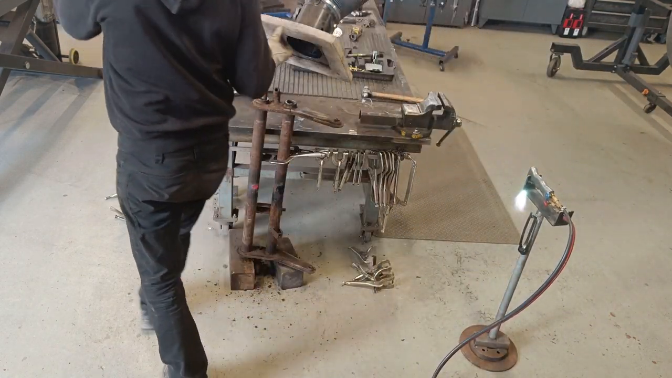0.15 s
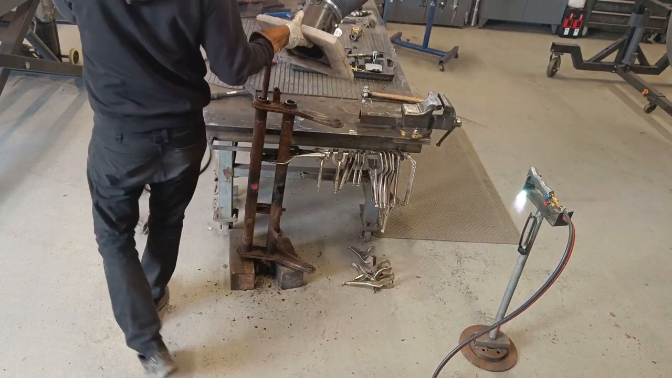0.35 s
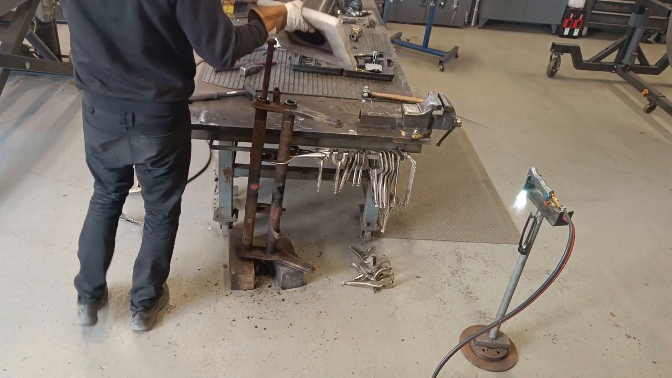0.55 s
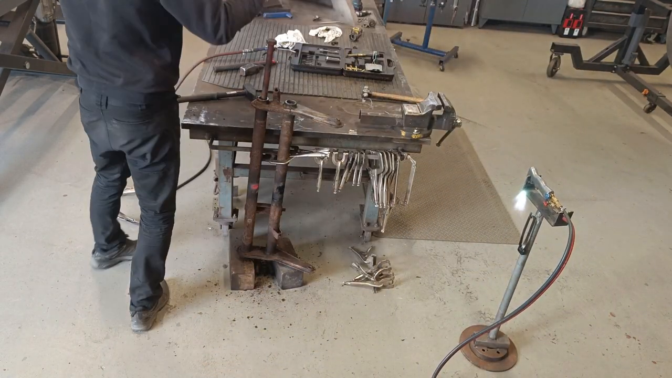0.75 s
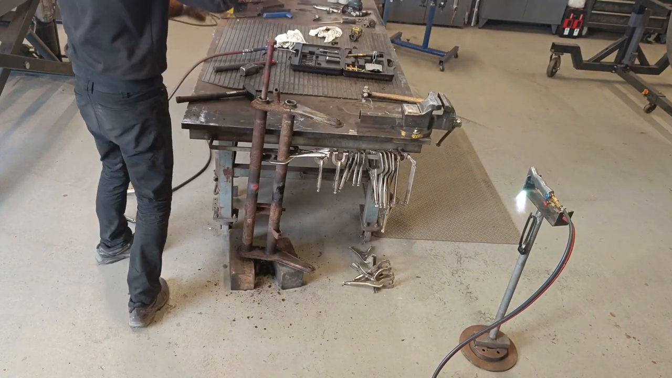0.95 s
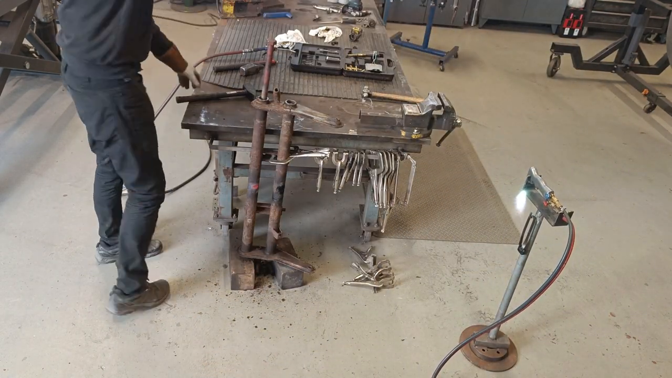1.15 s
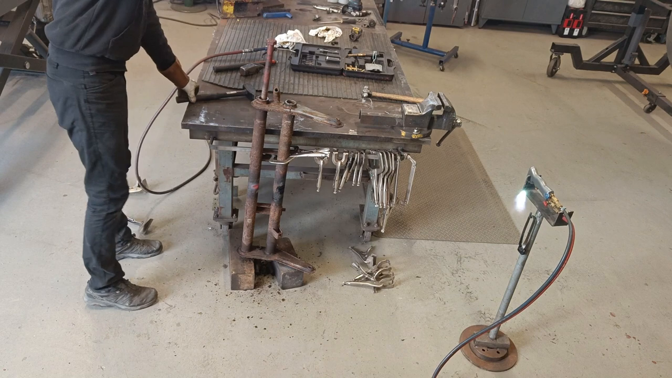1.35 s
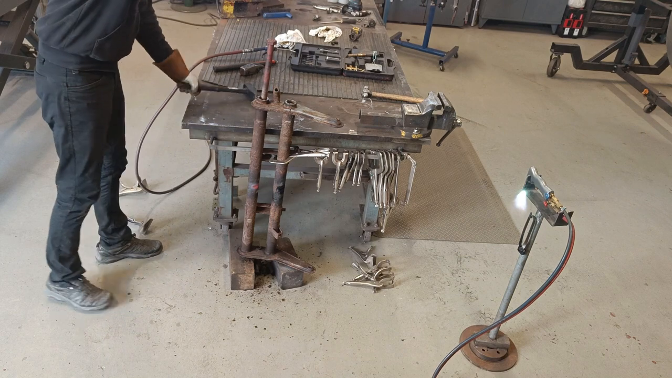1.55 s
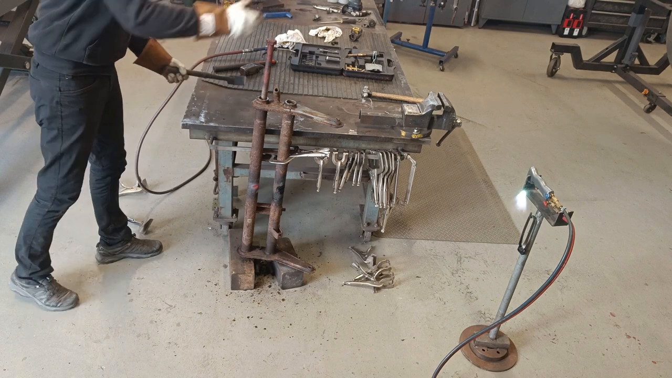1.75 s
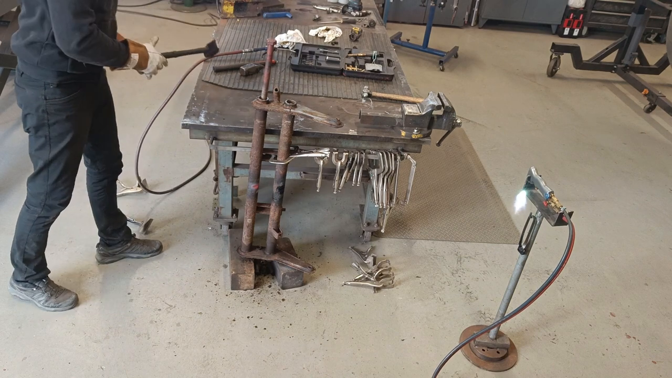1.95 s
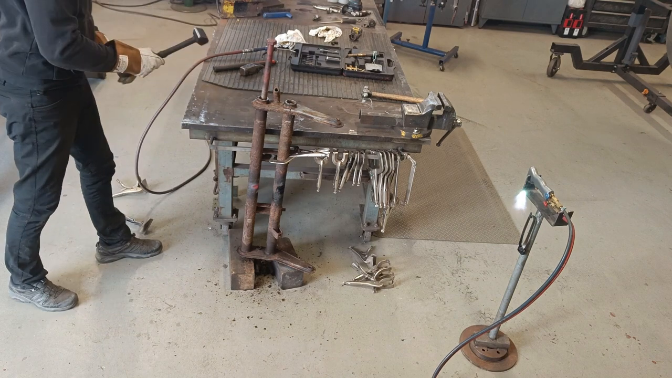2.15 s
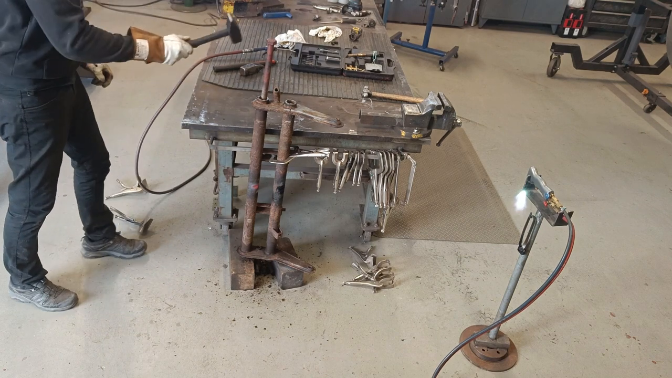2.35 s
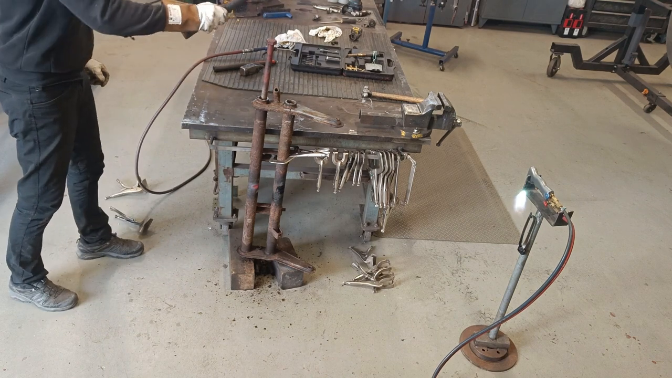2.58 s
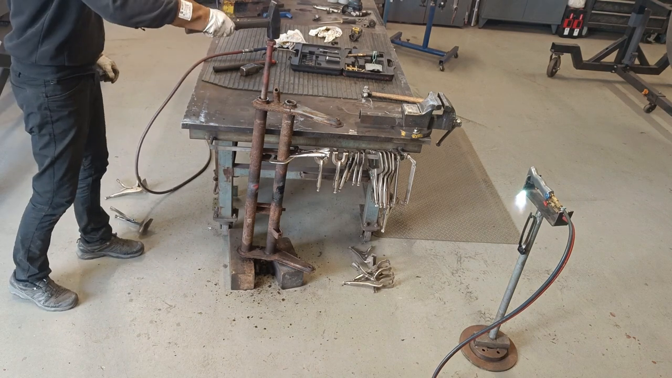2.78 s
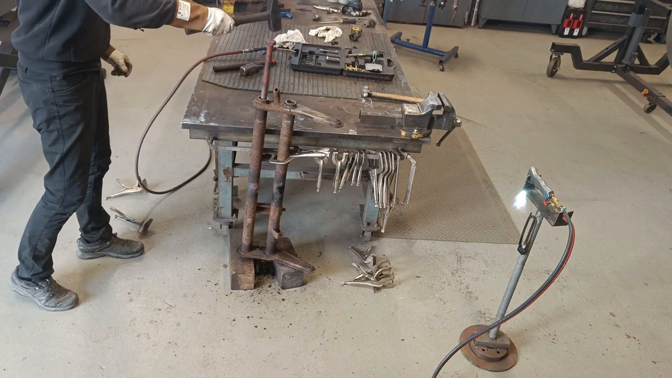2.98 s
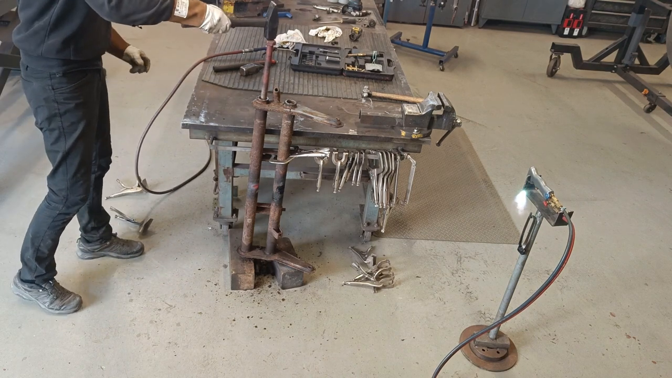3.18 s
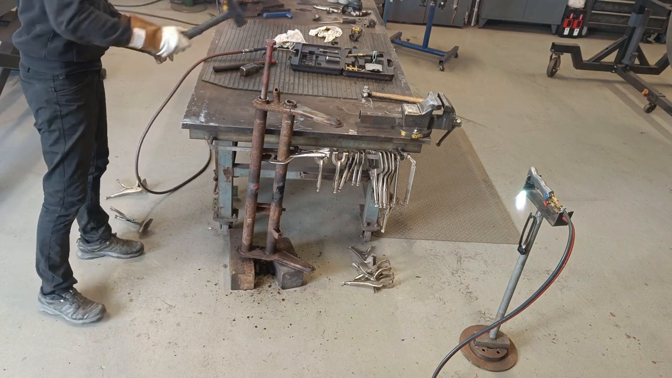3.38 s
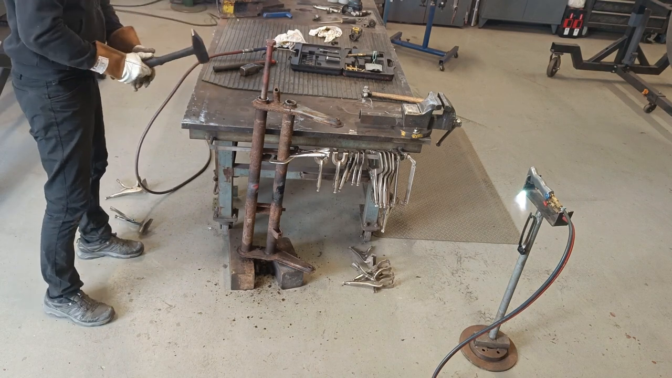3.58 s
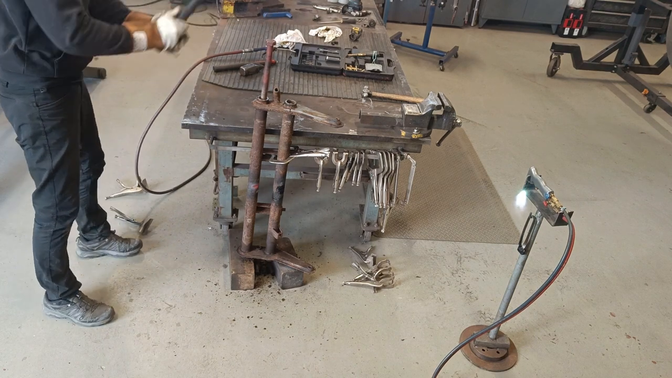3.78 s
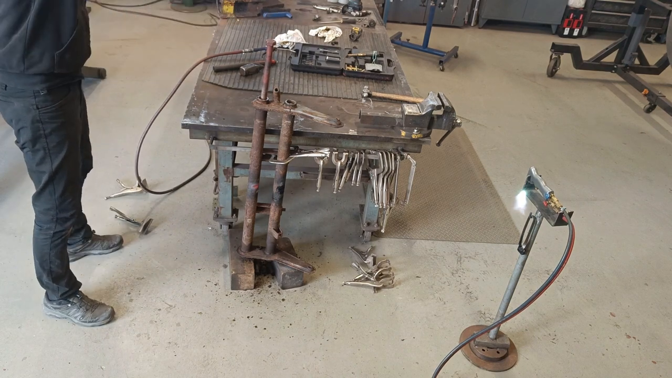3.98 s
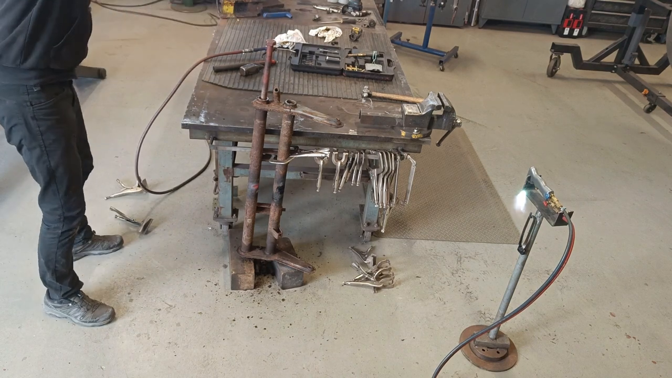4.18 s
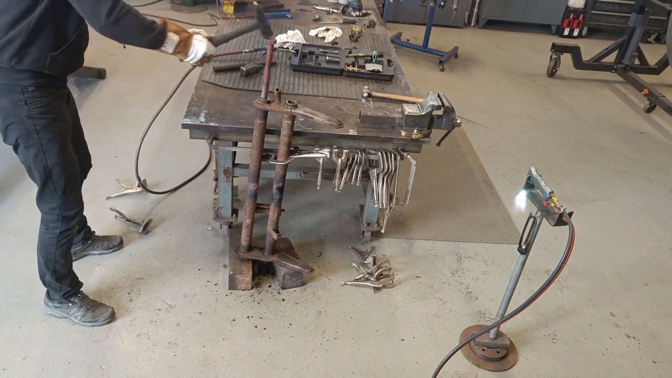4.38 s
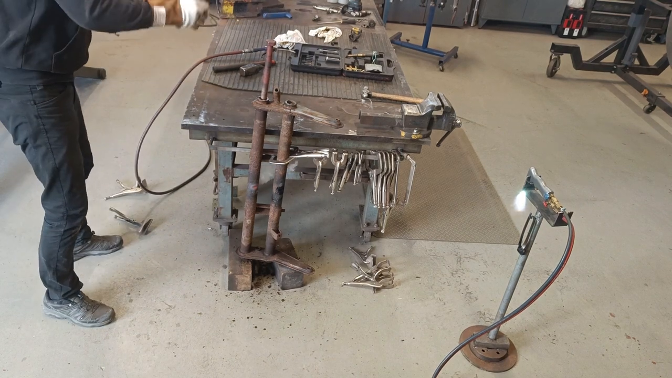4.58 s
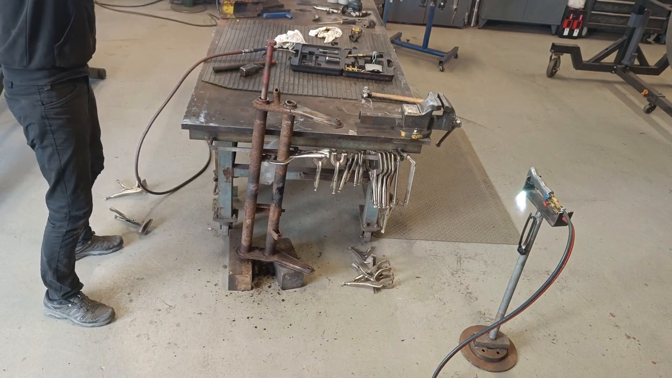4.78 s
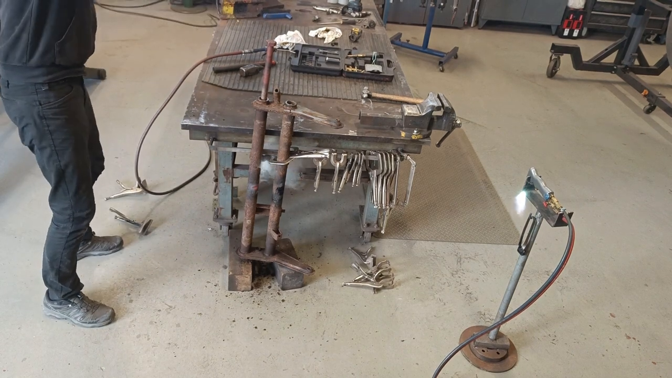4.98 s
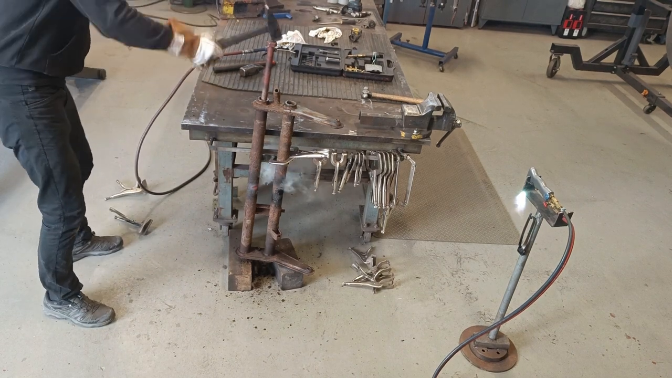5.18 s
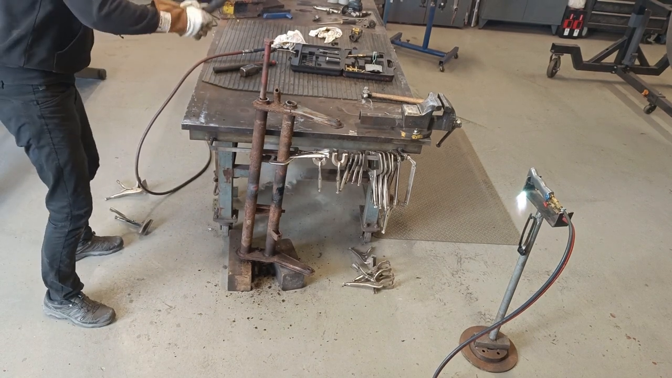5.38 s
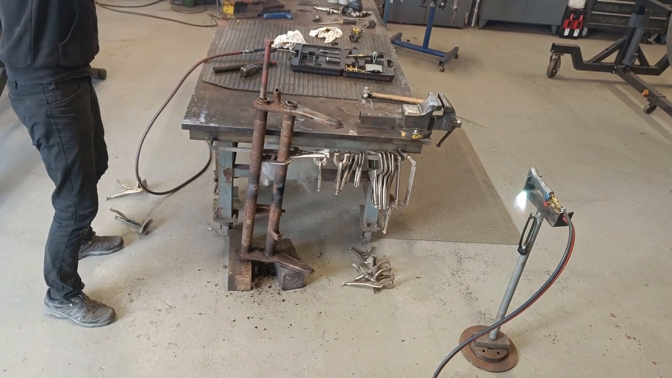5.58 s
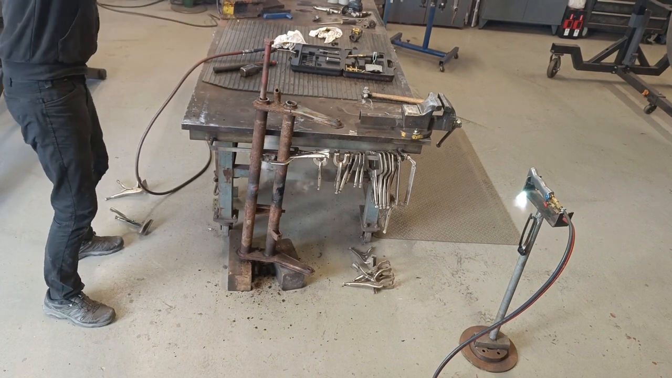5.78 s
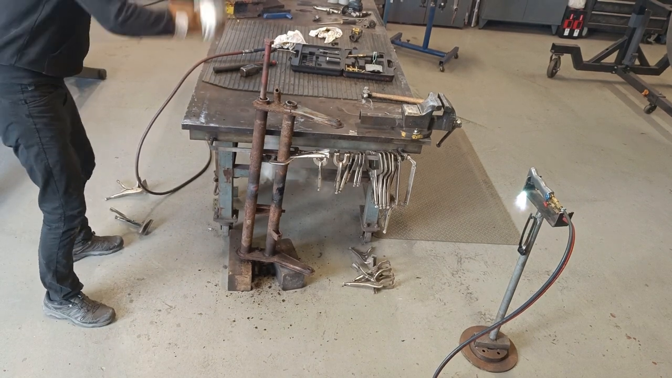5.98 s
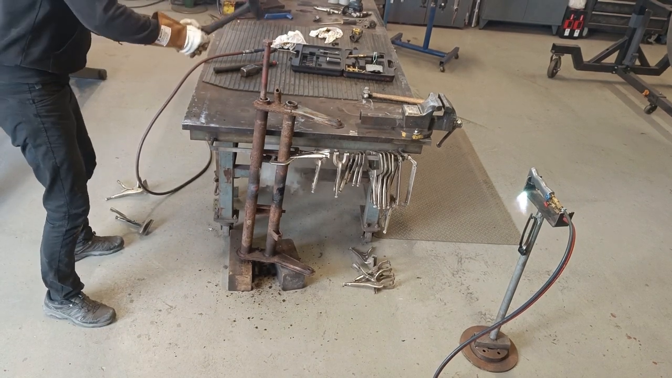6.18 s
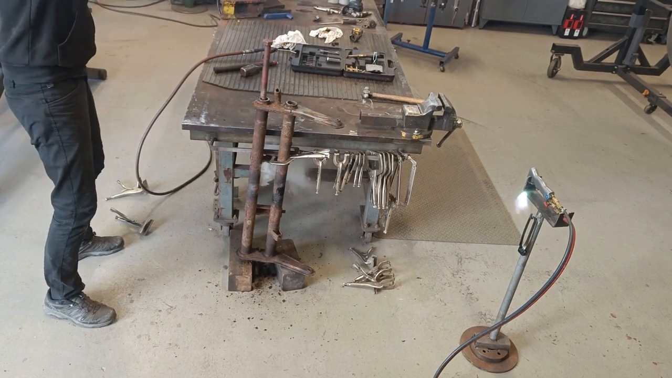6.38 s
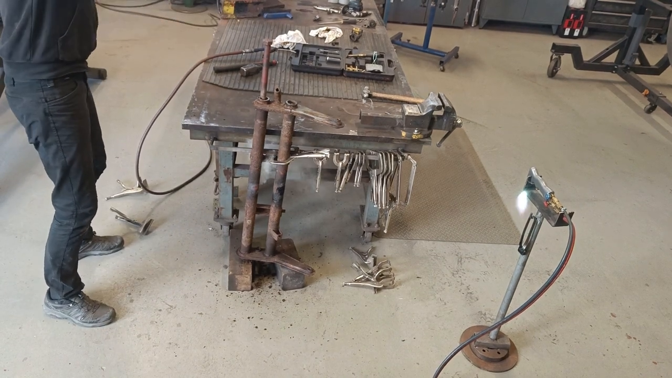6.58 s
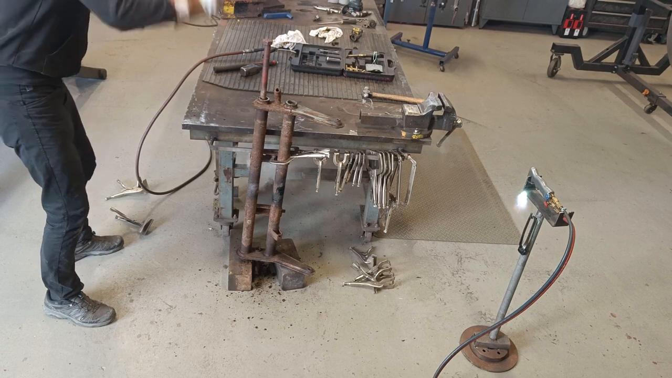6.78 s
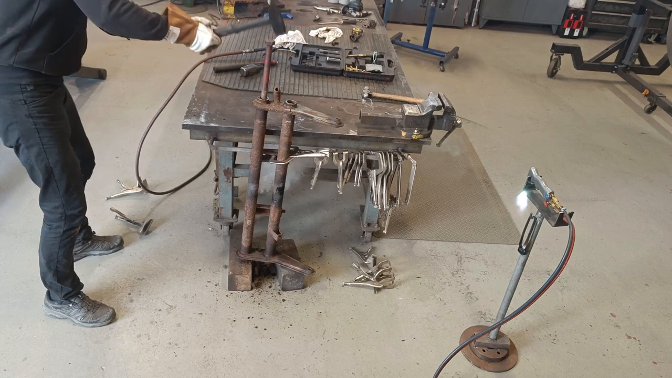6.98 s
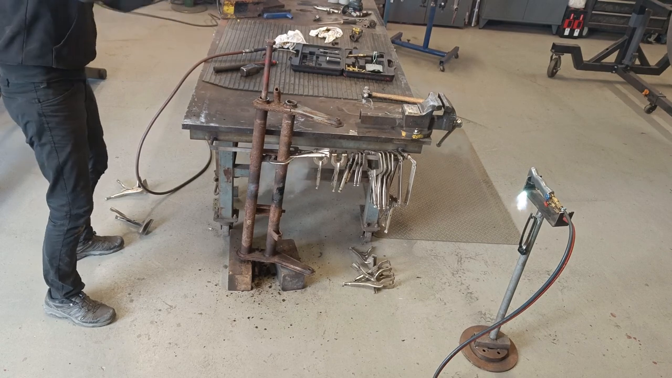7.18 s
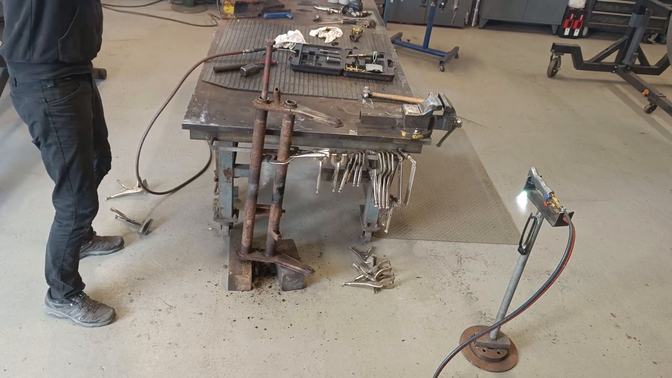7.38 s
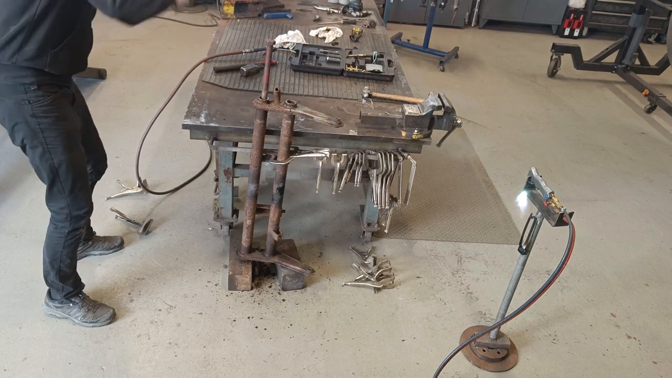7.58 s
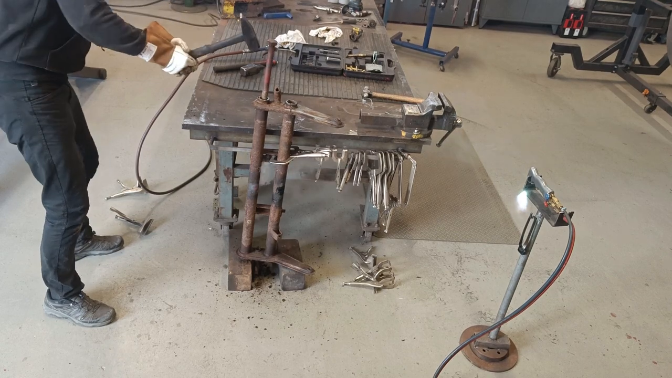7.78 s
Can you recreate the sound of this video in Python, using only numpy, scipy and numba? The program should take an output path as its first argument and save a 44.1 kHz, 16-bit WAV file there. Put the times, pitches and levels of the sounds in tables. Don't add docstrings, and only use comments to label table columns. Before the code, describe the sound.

From 0 to 2.8 seconds only a steady background is heard: the broad, flickering roar and hiss of a gas burner, faint high whistles from its nozzle, and a wavering low fan drone in a large workshop. At 2.8 seconds a hammer taps a steel rod brightly, and at 3.1 a weaker, duller tap follows with a low bench bump. After a pause come five full blows, at about 4.4, 5.2, 6.0, 6.9 and 7.7 seconds. The first is hard and damped, the next two freer and high-pitched, the last two lower, more open and longest ringing. Each has an instant crack, a rough metallic ring, clattering loose tools and a heavy thud through the bench legs. Echoes spread around the hall; the stereo microphone's automatic gain pushes the roar down after each blow, then lets it return.

```python
import sys
import numpy as np
from scipy import signal
from scipy.io import wavfile
from scipy.ndimage import uniform_filter1d, minimum_filter1d
from numba import njit

SR = 44100
rng = np.random.default_rng(int(sys.argv[2]) if len(sys.argv) > 2 else 0)


def decibels_to_gain(level_db):
    exponent = np.asarray(level_db, float) / 20
    return 10 ** exponent


def put_to_file(sound):
    columns = np.atleast_2d(sound).T
    safe = np.clip(columns, -1, 1)
    whole_steps = np.round(safe * 32767)
    wavfile.write(sys.argv[1], SR, whole_steps.astype(np.int16))


N = 345744

PIVOT_HZ = 2480


def in_bands(step):
    edges = 22 * 2 ** np.arange(0, 9.7, step)
    return zip(edges, edges[1:], np.sqrt(edges[:-1] * edges[1:]))


def band(x, low, high):
    return signal.sosfilt(signal.butter(2, [low, high], "band", fs=SR, output="sos"), x)


def rms_one(x):
    return x / np.sqrt(np.mean(x ** 2) + 1e-20)


def at_hz(points, hz):
    curve = np.array(points)
    return np.interp(np.log(hz), np.log(curve[:, 0]), curve[:, 1])


def drift(rate):
    r = np.exp(-80 * np.pi * rate / SR)
    slow = signal.lfilter([1], [1, -2 * r, r * r], rng.standard_normal(N // 40 + 2002))[2000:]
    return np.interp(np.arange(N) / 40, np.arange(len(slow)), rms_one(slow))


def pair(noises, hz):
    # pitch in Hz, likeness of left and right (1 = the same).
    likeness = [(30, 0.79), (60, 0.96), (120, 1), (250, 0.9), (500, 0.85), (1000, 0.23), (2000, 0.17),
                (8000, 0.1), (14000, 0.12)]
    # pitch in Hz, left minus right in dB.
    port_lean = [(60, 0), (550, 0.5), (1140, -1.7), (2380, 0), (4970, -5.5), (7180, -5), (10400, 8),
                 (15000, -7.5)]
    alike = np.clip(at_hz(likeness, hz), -1, 1)
    sides = np.array([[1], [-1]])
    shared = np.sqrt(1 + alike) * noises[0]
    opposed = np.sqrt(1 - alike) * noises[1] * sides
    return decibels_to_gain(at_hz(port_lean, hz) / 2 * sides) * (shared + opposed)


def roar(patchy_db):
    # pitch in Hz, level in dB per Hz.
    roar_curve = [(15, -55), (25, -13.5), (70, -28.5), (120, -8), (145, -6.5), (217, -19.5), (344, -17.5),
                  (575, -11), (734, -14), (2280, -21), (5430, -20.5), (6050, -20.5), (8590, -31.5),
                  (12500, -25), (16000, -27.5)]
    # pitch in Hz, width in Hz, level in dB.
    drone = [(114.2, 24, -38.5), (139.1, 11, -27.5), (157.1, 7.3, -28.5), (246.8, 30, -38),
             (573, 285, -35.5), (1081, 72, -33.5), (1408.6, 29, -38), (6044, 1100, -28)]
    # pitch in Hz, width in Hz, level in dB.
    whistles = [(5830, 21, -52), (5981, 17, -47), (6260, 28, -35), (6650, 23, -36.5), (7050, 25, -38.5),
                (15000, 40, -52)]
    wall_gap_s, standing, standing_hz = 0.047, 0.62, 348

    white, together, out = rng.standard_normal((2, 2, N)), drift(1.9), 0
    for k, (low, high, hz) in enumerate(in_bands(step=1 / 3)):
        flicker = 0.31 * together + drift(21.5)
        gain = decibels_to_gain(at_hz(roar_curve, hz) + patchy_db * flicker)
        out = out + gain * pair(band(white[k % 2], low, high), hz)

    gap = round(wall_gap_s * SR)
    bounce = np.roll(band(out, 42, standing_hz), gap, axis=1)
    out = out - standing * bounce + standing ** 2 * np.roll(bounce, gap, axis=1)
    out = decibels_to_gain(-23.5) * rms_one(out)

    for hz, width, level_db in drone + whistles:
        tone = band(rng.standard_normal((2, N)), hz - width / 2, hz + width / 2)
        waver_db = 3.5 if hz < standing_hz else 1.5
        out += decibels_to_gain(level_db - 4 + waver_db * drift(1.73)) * rms_one(pair(tone, hz))
    return out


def hall(x):
    # pitch in Hz, time to fade by 60 dB in seconds.
    fade_times = [(100, 1.03), (500, 1.35), (2000, 1.08), (5000, 0.74), (9000, 0.22), (15000, 0.038)]
    t = np.arange(round(1.5 * SR)) / SR
    white, echoes = rng.standard_normal((2, 2, len(t))), 0
    for k, (low, high, hz) in enumerate(in_bands(step=1 / 2)):
        fade = decibels_to_gain(-60 * t / at_hz(fade_times, hz))
        echoes = echoes + pair(band(white[k % 2], low, high), hz) * fade
    echoes *= (1 - np.exp(-t / 0.006)) / np.sqrt(np.sum(echoes ** 2) / 2)
    return signal.fftconvolve(x.mean(axis=0, keepdims=True), echoes, axes=1)[:, :N]


def rattle(length, spectrum, tilt_db, t60, grain_db, rise):
    t = np.arange(length) / SR
    clicks = rng.standard_normal((2, length)) * decibels_to_gain(grain_db * rng.exponential(1, length) - 60 * t / t60)
    clicks *= 1 - np.exp(-t / rise)
    out = 0
    for low, high, hz in in_bands(step=1 / 3):
        if spectrum[0][0] < hz < spectrum[-1][0]:
            gain = decibels_to_gain(at_hz(spectrum, hz) + tilt_db * np.log2(hz / PIVOT_HZ))
            out = out + gain * pair(band(clicks, low, high), hz)
    return out / np.sqrt(np.mean(out[:, :3000] ** 2))


def bench_thud(length, trial, sustain):
    # pitch in Hz, level in dB per Hz.
    thud_curve = [(45, -50), (75, -4), (120, 3.5), (220, -3), (350, -13.5), (700, -17.5), (1500, -59)]
    rock_hz, rock_t60_s = 53, 0.034
    thud_db, rock_db, rock_s = (-9.5, -4, 0.049) if trial else (-3.6, -19, 0.005)
    thud_db += 3.5 * min(sustain, 1)
    thud = decibels_to_gain(thud_db - 15.5) * rattle(length, thud_curve, 0, t60=0.25, grain_db=1.8, rise=0.12)
    late = np.maximum(np.arange(length) / SR - rock_s, 0)
    return thud + decibels_to_gain(rock_db - 60 * late / rock_t60_s) * np.sin(2 * np.pi * rock_hz * late)


def loose_tools(length, trial, tilt_db, sustain):
    # pitch in Hz, level in dB per Hz.
    tool_curve = [(300, -9), (700, 5), (1500, 5), (2600, 3), (4200, 6), (6500, -9.5), (8500, -20.5),
                  (11500, -17.5), (15500, -66)]
    if trial:
        tilt_db = -2.5
    return rattle(length, tool_curve, tilt_db, t60=0.073 + 0.35 * sustain, grain_db=2.76, rise=0.012)


def crack(length):
    # pitch in Hz, level in dB per Hz.
    crack_curve = [(5500, 7), (6800, 9), (8500, -4.5), (10500, -6), (13000, -0.5), (16500, -2.5)]
    return rattle(length, crack_curve, 0, t60=0.38, grain_db=2.0, rise=0.00041)


def ring(length, favoured_hz, tilt_db, sustain, rough):
    top_hz = [1060, 1150, 1320, 1450, 1626, 1836, 2102, 2125, 2170, 2194, 2236, 2870, 3085, 3130]
    rod_hz = [3664, 3725, 3763, 3910, 4080, 4180, 4235, 4410, 4480, 4700, 4950, 5080, 5550, 6390]
    # level in dB, time to fade by 60 dB in seconds.
    top_tones = [(-3, 0.055), (-12, 0.14), (-10, 0.22), (-13, 0.2), (-6, 0.15), (-8, 0.36), (-11.5, 0.73),
                 (-19, 0.77), (-15, .35), (-25, 0.27), (-12, 0.27), (-9, 0.27), (-12.5, 0.41),
                 (-13.5, 0.32)]
    rod_tones = [(-9, 0.14), (-9.5, 0.47), (-8, 0.27), (-4, 0.087), (-21, 0.2), (-8.5, 0.28), (-8.5, 0.26),
                 (-14, 0.45), (-14, 0.35), (-10, 0.34), (-7.5, 0.35), (-23.5, 0.11), (-30, 0.13),
                 (-25, 0.4)]
    favour_db, favour_t60_gain, favour_octaves = 7, 0.7, 0.07
    bright_top_hz = 4250
    swell_share, swell_s = 0.6, 0.009

    hz = np.array(top_hz + rod_hz)[:, None]
    level_db, t60 = np.transpose(top_tones + rod_tones)[:, :, None]
    t = np.arange(length) / SR

    octaves = np.log2(hz / favoured_hz)
    near = np.exp(-(octaves / favour_octaves) ** 2)
    near = near + 0.6 * np.exp(-((octaves - 1.04) / favour_octaves) ** 2)
    struck = decibels_to_gain(tilt_db * np.log2(np.minimum(hz, bright_top_hz) / PIVOT_HZ) + favour_db * near)
    t60 = t60 * (1 + favour_t60_gain * near)

    knots = rng.standard_normal((3, 2, len(hz), length // 300 + 2))
    knots = knots[0] + 0.5 * knots[1:]
    step, part = np.divmod(np.arange(length) / 300, 1)
    step = step.astype(int)
    wander = knots[..., step] * (1 - part) + knots[..., step + 1] * part

    height = struck * decibels_to_gain(level_db - 60 * t / (t60 * sustain))
    height = height * (1 - swell_share * np.exp(-t / swell_s))
    phase = 2 * np.pi * (hz * t + rng.random(hz.shape))
    in_step = (1 + rough * wander[:, 0]) * np.sin(phase)
    out_of_step = rough * wander[:, 1] * np.cos(phase)
    return np.sum(height * (in_step + out_of_step), axis=1)


def blows():
    # start in seconds, force in dB, favoured pitch in Hz, brightness in dB per octave,
    # how freely it rings (a factor on the fade time).
    hits = [
        (2.7918, -2.5, 3110, 7, 0.47),
        (3.107, -7.5, 1860, -10, 0.32),
        (4.4175, 10.5, 3880, 1.1, 0.32),
        (5.2465, 10, 3550, 0.5, 0.77),
        (6.0433, 8.5, 4050, 1.2, 0.84),
        (6.8652, 7, 2200, -0.3, 1.08),
        (7.6802, 7, 2190, -0.3, 1.34),
    ]
    trial_taps = 2
    place_db = 2
    length = SR * 3 // 5
    steel, bench = np.zeros((2, N + SR)), np.zeros((2, N + SR))
    for k, (s, force_db, favoured_hz, tilt_db, sustain) in enumerate(hits):
        trial = k < trial_taps
        sound = decibels_to_gain(-19.5) * ring(length, favoured_hz, tilt_db, sustain, rough=2.33)
        sound += decibels_to_gain(-14) * loose_tools(length, trial, tilt_db, sustain)
        sound += decibels_to_gain(-23.5 + 0.69 * min(tilt_db, 2)) * crack(length)
        thud = bench_thud(length, trial, sustain)
        at = round(s * SR)
        steel[:, at:at + length] += decibels_to_gain(force_db) * sound * decibels_to_gain([[place_db / 2], [-place_db / 2]])
        bench[:, at:at + length] += decibels_to_gain(force_db) * thud
    return steel[:, :N], bench[:, :N]


def scene():
    steel, bench = blows()
    air = roar(patchy_db=0.4)
    air = np.array([np.roll(air[0], 4), air[1]])
    echoes = hall(steel + decibels_to_gain(-6.0) * band(bench, 96, 570))
    return decibels_to_gain(0.5) * steel + decibels_to_gain(0.5) * bench + decibels_to_gain(-2.5) * echoes + air


@njit
def follow(target, grab, recover):
    out, state = np.empty_like(target), 0.
    for i in range(len(target)):
        state += (target[i] - state) * (grab if target[i] > state else recover)
        out[i] = state
    return out


def band_limit(x):
    return signal.sosfilt(signal.butter(12, 15770, fs=SR, output="sos"), x)


def record(dry):
    ceiling_db, squeeze = -20.5, 1.0
    grab_s, recover_s, linger_s = 0.063, 0.23, 0.13
    peak_limit_db, peak_back_s = -2.5, 0.03

    dry = signal.sosfilt(signal.butter(2, 44, "high", fs=SR, output="sos"), dry)
    dry = signal.sosfilt(signal.cheby2(16, 50, 16150, fs=SR, output="sos"), dry)

    power = uniform_filter1d(np.mean(dry ** 2, axis=0), size=900, origin=449)
    level_db = 10 * np.log10(power + 1e-12)
    over_db = np.maximum(level_db - ceiling_db, 0) * squeeze
    duck_db = follow(over_db, 1 / (grab_s * SR), 1 / (recover_s * SR))
    duck_db = follow(duck_db, 1., 1 / (linger_s * SR))
    x = dry * decibels_to_gain(-duck_db)

    peak = -minimum_filter1d(-np.abs(x).max(axis=0), size=48)
    peak_db = 20 * np.log10(peak + 1e-9)
    cut_db = follow(np.maximum(peak_db - peak_limit_db, 0), 1 / 8, 1 / (peak_back_s * SR))
    return band_limit(x * decibels_to_gain(-cut_db))


dry = scene()
out = record(dry)
put_to_file(out)
```